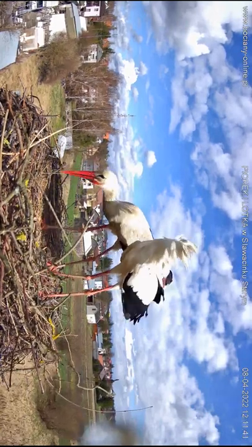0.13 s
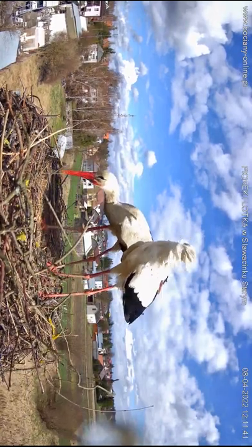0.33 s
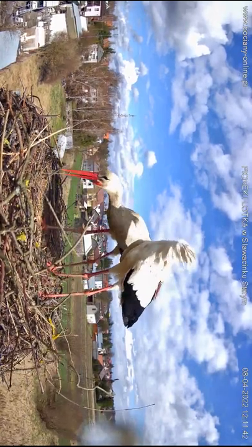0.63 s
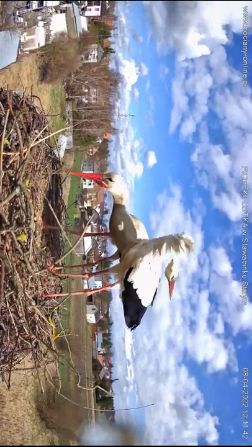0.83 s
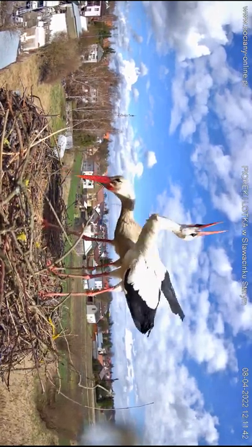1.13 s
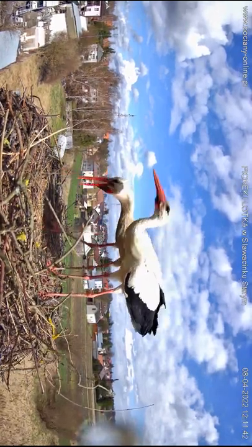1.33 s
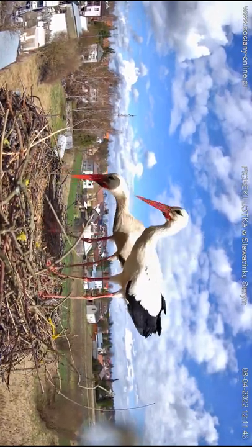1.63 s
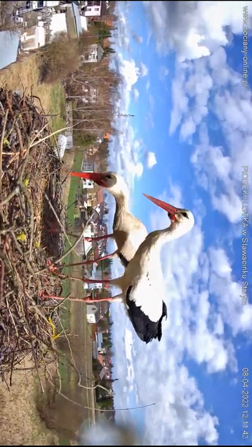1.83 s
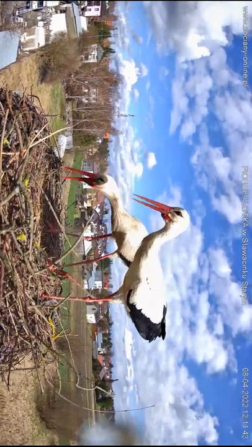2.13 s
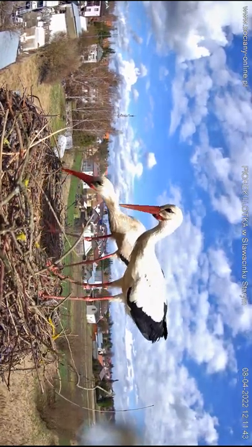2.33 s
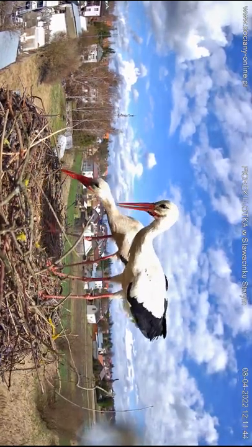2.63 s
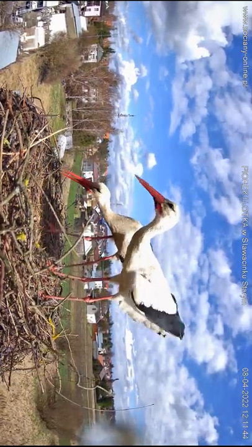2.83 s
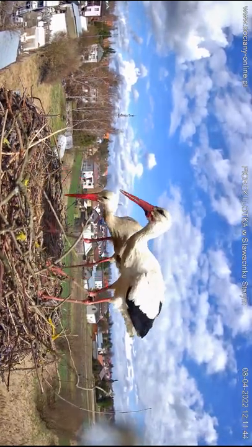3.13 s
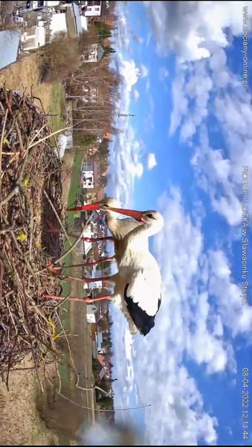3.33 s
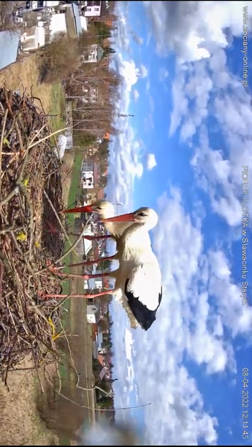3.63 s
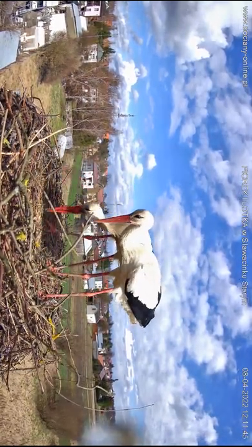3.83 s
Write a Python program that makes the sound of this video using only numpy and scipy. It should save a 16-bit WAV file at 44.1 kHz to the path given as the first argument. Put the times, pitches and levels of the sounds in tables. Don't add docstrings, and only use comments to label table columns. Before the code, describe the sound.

Stork bill clattering: loud, hollow, rapid wooden clacks from two birds, over gusty low wind.

```python
import sys
import numpy as np
from scipy import signal
from scipy.io import wavfile
from scipy.ndimage import uniform_filter1d

SR = 44100
rng = np.random.default_rng(int(sys.argv[2]) if len(sys.argv) > 2 else 0)


def generate_wav(sig):
    pcm = np.round(np.clip(np.atleast_2d(sig).T, -1, 1) * 32767).astype(np.int16)
    wavfile.write(sys.argv[1], SR, pcm)


def field_ratio(decibels):
    return 10 ** (np.asarray(decibels, dtype=float) / 20)


N = 176400

SNAP_HZ, SNAP_T60 = 4200, 0.0035
CRACK_T60 = 0.008
CEILING, FLOOR_LIMIT = 0.78, 0.45


def evened(x):
    return x / np.sqrt(np.mean(x ** 2) + 1e-20)


def read(points, hz):
    f, value = np.transpose(points)
    return np.interp(np.log(hz + 1), np.log(f + 1), value)


def add(mix, s, sound):
    part = mix[round(s * SR):][:len(sound)]
    part += sound[:len(part)]


def resonate(x, hz, width):
    turn = np.exp(2j * np.pi * np.cumsum(hz * np.ones(len(x))) / SR)
    r = np.exp(-np.pi * width / SR)
    return 2 * (turn * signal.lfilter([1 - r], [1, -r], x / turn)).real


def ring(modes, hz, rise_s, glide, glide_s, grip_s):
    detune, linger_db = 0.012, -27
    t = np.arange(2048) / SR
    turns = hz * (t - glide * glide_s * (1 - np.exp(-t / glide_s)))
    tones = 0
    for ratio, db, t60 in modes:
        off = 1 + detune * rng.standard_normal() * (ratio != 1)
        tones = tones + field_ratio(db - 60 * t / t60) * np.sin(2 * np.pi * ratio * off * turns)
    grip = np.exp(-(t / grip_s) ** 3) + field_ratio(linger_db)
    return (1 - np.exp(-t / rise_s)) * grip * tones


def crack(db, t60, top_hz=8000):
    rise_s = 0.00085
    t = np.arange(2048) / SR
    bright = np.diff(rng.standard_normal(2049))
    noisy = signal.lfilter(*signal.butter(4, top_hz, fs=SR), bright)
    return (1 - np.exp(-t / rise_s)) * field_ratio(db - 60 * t / t60) * evened(noisy)


def knock(hz, db, t60):
    touch_s = 0.00015
    t = np.arange(2048) / SR
    return (1 - np.exp(-t / touch_s)) * field_ratio(db - 60 * t / t60) * np.sin(2 * np.pi * hz * t)


def near_bird():
    # (time [s], clap level [dB], throat pitch [Hz], low tone level [dB])
    near_claps = [(0.0841, -7, 2430, 3.5), (0.217, -6, 2495, 2), (0.3468, -4.5, 2450, 2.5),
                  (0.4769, -2, 2444, 0.5), (0.6127, 0.5, 2430, -1.5), (0.7454, 2.5, 2400, -1.5),
                  (0.8792, 5, 2394, -5.5), (1.0147, 3.5, 2370, -3.5), (1.151, 3.5, 2343, -3.5),
                  (1.286, 2, 2347, -4.5), (1.4183, 4, 2320, -5.5), (1.553, 3, 2312, -7.5),
                  (1.6857, 4.5, 2320, -4.5), (1.818, 4.5, 2305, -7), (1.9639, 3, 2277, -10.5)]
    # (ratio to throat pitch, level [dB], t60 [s])
    near_modes = [
        (1, 3.5, 0.016),
        (1.35, -6.5, 0.015),
        (1.64, -5, 0.013),
        (2.02, -0.5, 0.0056),
        (2.36, -6.5, 0.011),
        (2.7, -9.5, 0.006),
        (3.3, 7.5, 0.0018),
    ]
    drive_db, crack_db = 7.5, -15
    out = np.zeros(N)
    for s, db, hz, low_db in near_claps:
        low = (0.7003, low_db, 0.017)
        thud = (0.306, -13.5 - 4.5 * s, 0.018)
        body = ring(near_modes + [low, thud], hz, rise_s=0.0025, glide=0.14, glide_s=0.002, grip_s=0.012)
        contact = crack(0, CRACK_T60) + knock(SNAP_HZ, 0, SNAP_T60)
        add(out, s, field_ratio(db + drive_db) * (body + field_ratio(crack_db) * contact))
    return out


def turning_bird():
    # (time [s], level [dB], bill pitch [Hz], bill level [dB], throat level [dB])
    snaps = [(0.0054, -15.5, 1690, 3, -4), (0.1036, -15.5, 2080, -1, -8), (0.2037, -10, 1720, 0, -7),
             (0.304, -10, 1840, 0.5, -2), (0.404, -11.5, 1740, 1.5, 2.5), (0.5052, -11, 1760, 1.5, -1),
             (0.611, -15, 1710, 0, 6), (0.7198, -12.5, 1790, 0, -3), (0.8344, -9.5, 1860, -2.5, -5),
             (0.955, -6, 1880, -3.5, -8.5), (1.0852, -8.5, 1880, 1.5, -12), (1.2249, -9, 2030, 4.5, -11),
             (1.5196, -11.5, 1900, -4, -6), (2.4018, -16, 1900, -3, -4), (2.8544, -20, 1770, -14, -13)]
    # (time [s], level [dB], throat pitch [Hz], knock pitch [Hz], knock level [dB])
    facing_claps = [
        (1.3708, -5, 2360, 1016, -8.5),
        (1.66, 2.5, 2624, 860, -12.5),
        (1.8062, 1.5, 2690, 847, -12.5),
        (1.9537, 1.5, 2650, 850, -13),
        (2.102, 6.5, 2665, 830, -15),
        (2.2518, 2, 2600, 880, -13.5),
        (3.0249, -8.5, 2434, 800, -10.5),
    ]
    # (time [s], level [dB], pitch [Hz])
    taps = [(0.0204, -40, 3600), (0.094, -33, 7000), (0.227, -33, 6450), (0.310, -36, 5000),
            (0.357, -40, 7000), (0.4253, -22, 4200), (0.511, -39, 6500), (0.7265, -32, 6500),
            (0.841, -25, 5300), (0.9619, -22, 5050), (0.966, -34, 5300), (1.094, -25, 5500),
            (1.098, -37, 5500), (1.2344, -30, 6000), (1.382, -32, 6000), (1.5324, -40, 6500),
            (1.541, -40, 4500), (1.674, -16, 4600), (2.0797, -25, 4670), (2.1248, -26, 4000),
            (2.263, -16, 4430), (2.269, -30, 4700), (2.4194, -29, 4570), (2.698, -34, 4500),
            (2.710, -33, 3300), (2.863, -27, 3630), (3.039, -25.5, 4340), (3.1924, -31.5, 3730),
            (3.7506, -56, 3750)]
    # (ratio to throat pitch, level [dB], t60 [s])
    turn_modes = [
        (1, 5.5, 0.014),
        (1.25, -7, 0.0098),
        (1.75, -8.5, 0.014),
        (2.1, -1, 0.0065),
        (2.9, -27, 0.0036),
    ]
    tip_hz, tip_t60 = 14600, 0.003
    turn_s, tip_turned_db = 1.3, -10
    soft_top_hz, hard_top_hz = 7000, 11100
    out = np.zeros(N)
    for s, db, bill_hz, bill_db, throat_db in snaps:
        snap = -knock(SNAP_HZ, 3.5, SNAP_T60) + crack(-8, CRACK_T60, soft_top_hz)
        bill = knock(bill_hz, bill_db, 0.0083) - knock(1084, -5.5, 0.016)
        tip = knock(tip_hz, -16 + tip_turned_db * (s > turn_s), tip_t60)
        edge = knock(5900, -5, SNAP_T60)
        throat = knock(2620, throat_db, 0.013)
        add(out, s, field_ratio(db) * (snap + bill + tip + edge + throat))
    for s, db, hz, knock_hz, knock_db in facing_claps:
        body = ring(turn_modes, hz, rise_s=0.0011, glide=0.284, glide_s=0.0016, grip_s=0.0094)
        body = body + knock(knock_hz, knock_db, 0.022)
        top_hz = hard_top_hz if db > -3 else soft_top_hz
        add(out, s, field_ratio(db) * (body + crack(-8.5, CRACK_T60, top_hz)))
    for s, db, hz in taps:
        tip = knock(tip_hz, -17 + tip_turned_db * (s > turn_s), tip_t60)
        add(out, s, field_ratio(db + 5) * (knock(hz, 0, 0.005) + tip + crack(-9.5, CRACK_T60)))
    return out


def nest(x):
    level_db, low_hz, t60, delay_s = -22.5, 2600, 0.045, 0.004
    t = np.arange(4096) / SR
    tail = rng.standard_normal(4096) * field_ratio(-60 * t / t60) * np.clip(t / delay_s, 0, 1) ** 2
    tail = signal.lfilter(*signal.butter(2, low_hz, "high", fs=SR), tail)
    limited = np.clip(x, -CEILING, CEILING)
    return field_ratio(level_db) * signal.oaconvolve(limited, tail / np.linalg.norm(tail))[:N]


def hisses():
    # (time [s], length [s], level [dB], mouth opening at start [0-1], at end [0-1], treble [dB], rise [s])
    breaths = [
        (1.35, 0.2, -35, 0, 1, 0.5, 0.049),
        (1.911, 0.045, -36, 0.36, 0.7, 3, 0.0069),
        (1.978, 0.15, -37, 0.066, 0.2, -4.5, 0.026),
        (2.121, 0.26, -45, 0.25, 0, -8, .01),
    ]
    # (pitch shut [Hz], pitch open [Hz], width [Hz], level shut [dB], level open [dB])
    hollows = [
        (1100, 1100, 200, -26, -12),
        (2100, 2300, 350, -5, -14),
        (2400, 3340, 370, -2, -6),
        (3500, 3700, 580, -7.5, -2),
        (4540, 5500, 810, -6, -17),
        (5500, 6500, 1200, -10, -22),
        (7400, 8200, 2400, -14, -17),
    ]
    top_hz, flutter_db, edge_s = 10200, 3.2, 0.012
    low_pass = signal.butter(8, top_hz, fs=SR, output="sos")
    out = np.zeros(N)
    for s, length, db, first, last, treble_db, rise_s in breaths:
        t = np.arange(0, length, 1 / SR)
        air = rng.standard_normal(len(t))
        mouth = first + (last - first) * t / length
        slow = uniform_filter1d(rng.standard_normal((len(hollows), SR // 2)), size=700, axis=1)
        flutter = evened(slow)[:, :len(t)]
        voiced = 0
        for (shut_hz, open_hz, width, shut_db, open_db), wobble in zip(hollows, flutter):
            hz = shut_hz + (open_hz - shut_hz) * mouth
            band = evened(resonate(resonate(air, hz, width), hz, width))
            band_db = shut_db + (open_db - shut_db) * mouth + treble_db * (shut_hz > top_hz / 2)
            voiced = voiced + field_ratio(band_db + flutter_db * wobble) * band
        fade = np.clip(np.minimum(t / rise_s, (length - t) / edge_s), 0, 1)
        add(out, s, field_ratio(db) * fade * evened(signal.sosfilt(low_pass, voiced)))
    return out


def gliding_air(rushes, width):
    out = np.zeros(N)
    for s, length, from_hz, to_hz, db in rushes:
        u = np.arange(0, 1, 1 / (length * SR))
        hz = from_hz + (to_hz - from_hz) * u
        air = rng.standard_normal(len(u))
        tone = resonate(resonate(air, hz, width), hz, width)
        add(out, s, field_ratio(db) * np.sqrt(np.sin(np.pi * u)) * evened(tone))
    return out


def hiss_streaks():
    # (time [s], length [s], from [Hz], to [Hz], level [dB])
    whistles = [
        (1.35, 0.035, 2720, 2950, -41.5),
        (1.377, 0.067, 2170, 2280, -38),
        (1.379, .04, 3500, 3550, -38),
        (1.429, .04, 2400, 2900, -34),
        (1.438, .032, 1170, 1160, -35),
        (1.464, 0.051, 3400, 3720, -34),
        (1.915, 0.052, 2880, 2860, -39),
        (1.922, 0.039, 4850, 4900, -39),
    ]
    return gliding_air(whistles, width=270)


def twig_whooshes():
    # (time [s], length [s], from [Hz], to [Hz], level [dB])
    whooshes = [
        (.05, 0.075, 1200, 990, -27),
        (2.11, 0.051, 990, 1040, -30.5),
        (2.2, .12, 3000, 2900, -44.5),
        (2.44, .12, 1100, 1210, -41.5),
    ]
    return gliding_air(whooshes, width=600)


def noise(spectrum, size, patch_db, shared_db):
    frames, hz = 4 * N // size + 5, np.fft.rfftfreq(size, 1 / SR)
    a, b, patches = rng.standard_normal((frames, len(hz), 3)).T
    patches = uniform_filter1d(patches, size // 64, 0)
    patches = evened(uniform_filter1d(patches, size=10, axis=1))
    shared = evened(uniform_filter1d(rng.standard_normal(frames), size=3))
    level_db = read(spectrum, hz)[:, None] + patch_db * patches + shared_db * shared
    z = (a + 1j * b) * field_ratio(level_db)
    return evened(signal.istft(z, nperseg=size, noverlap=3 * size // 4)[1][:N])


def wind():
    # (time [s], level [dB])
    roar_gusts = [(0.0, -25.5), (0.1, -26.5), (0.2, -27), (0.49, -29.5), (0.9, -30), (1.07, -31.5),
                  (1.2, -41.5), (1.53, -36.5), (1.79, -39.5), (2.02, -37.5), (2.15, -27), (2.31, -31.5),
                  (2.53, -27.5), (2.76, -34), (3.12, -33), (3.35, -35.5), (3.55, -34.5), (4.0, -35.5)]
    # (time [s], level [dB])
    rumble_gusts = [(0.0, -36), (0.26, -39.5), (0.86, -42.5), (1.15, -45), (1.88, -48), (2.09, -38),
                    (2.67, -34), (2.97, -42.5), (3.31, -40), (3.77, -44), (3.89, -41.5), (4.0, -35)]
    # (pitch [Hz], level per Hz [dB])
    roar_colour = [
        (53, -62),
        (90, -12),
        (224, -11),
        (900, -6.5),
        (1280, -3),
        (1510, -7),
        (2900, -16.5),
        (9500, -46.5),
        (16000, -64),
    ]
    # (pitch [Hz], level per Hz [dB])
    rumble_colour = [
        (15, 4),
        (35, 3),
        (70, -10.5),
        (140, -10.5),
        (300, -25),
        (600, -52),
    ]
    t = np.arange(N) / SR
    moan = evened(resonate(rng.standard_normal(N), 625, 14))
    roar = noise(roar_colour, size=512, patch_db=2.5, shared_db=1.5) + field_ratio(-15.5) * moan
    rumble = noise(rumble_colour, size=2048, patch_db=0.5, shared_db=-1.5)
    roar_db = 0.16 + np.interp(t, *np.transpose(roar_gusts))
    rumble_db = -2.5 + np.interp(t, *np.transpose(rumble_gusts))
    return field_ratio(roar_db) * roar + field_ratio(rumble_db) * rumble


def scene():
    claps = near_bird() + turning_bird()
    birds = claps + nest(claps) + hisses() + hiss_streaks()
    return (birds + twig_whooshes() + wind())[None]


def overload(x):
    knee = 8.0
    span = round(0.002 * SR)
    bias = np.zeros_like(x)
    for _ in range(5):
        v = x - bias
        limit = np.where(v > 0, CEILING, FLOOR_LIMIT)
        out = v / (1 + (abs(v) / limit) ** knee) ** (1 / knee)
        bias = bias + 0.79 * uniform_filter1d(uniform_filter1d(out - x, span), span)
    return out


def starve(x):
    # (start [s], end [s], from [Hz])
    treble_holes = [(.072, .081, 4200), (.322, .342, 6500), (.491, .499, 3000), (.711, .717, 4000),
                    (.730, .741, 2500), (.820, .830, 6000), (.860, .875, 3300), (.947, .952, 4500),
                    (1.026, 1.031, 5000), (1.139, 1.147, 1300), (1.240, 1.245, 4500), (1.267, 1.283, 2000),
                    (1.298, 1.306, 3500), (1.350, 1.367, 4200), (1.651, 1.656, 2000), (1.669, 1.682, 2200),
                    (2.845, 2.851, 5000), (3.008, 3.021, 7000)]
    hole_db, smear_db, smear_hz, smear_taps = -26, -19, 3200, 441
    hz, t, z = signal.stft(x, SR, nperseg=256, noverlap=224)
    hole = sum((hz[:, None] > low_hz) & (t > a) & (t < b) for a, b, low_hz in treble_holes)
    kept = signal.istft(z * field_ratio(hole_db * hole), SR, nperseg=256, noverlap=224)[1][:, :N]
    blur = rng.standard_normal(smear_taps) * np.hanning(smear_taps)
    blur = signal.filtfilt(*signal.butter(2, smear_hz, "high", fs=SR), blur)
    smear = signal.oaconvolve(kept, blur[None] / np.linalg.norm(blur), "same")
    return kept + field_ratio(smear_db) * smear


def top_cut(x):
    return signal.sosfilt(signal.butter(12, 16990, fs=SR, output="sos"), x)


def record(dry):
    dulled = signal.lfilter(*signal.butter(1, 9900, fs=SR), overload(dry))
    band_limit = signal.firwin(127, 16250, window=("kaiser", 9), fs=SR)
    limited = signal.oaconvolve(starve(dulled), band_limit[None], "same")
    return top_cut(limited)


dry = scene()
out = record(dry)
generate_wav(out)
```